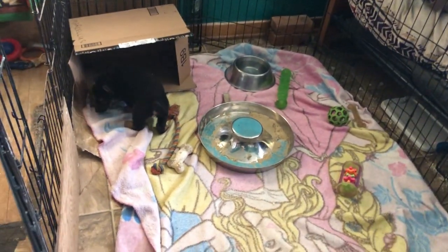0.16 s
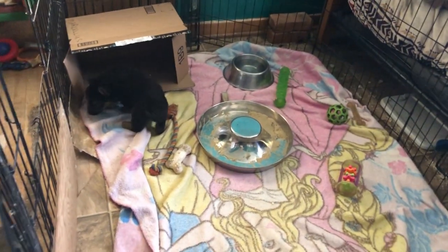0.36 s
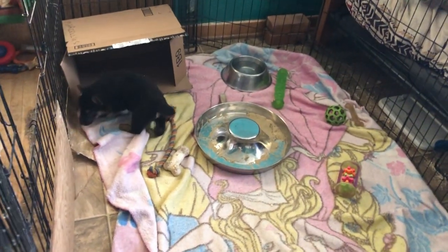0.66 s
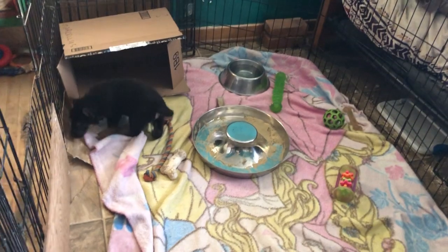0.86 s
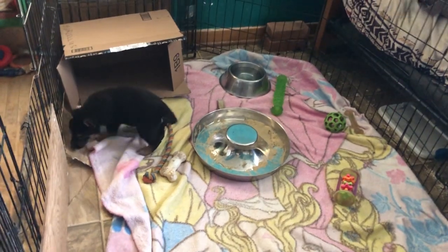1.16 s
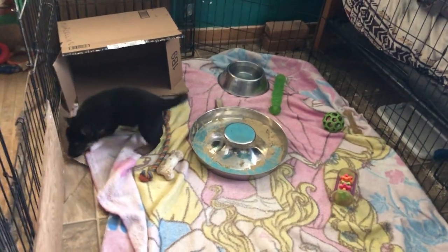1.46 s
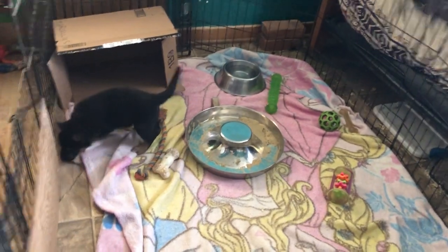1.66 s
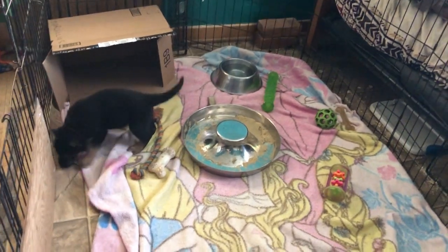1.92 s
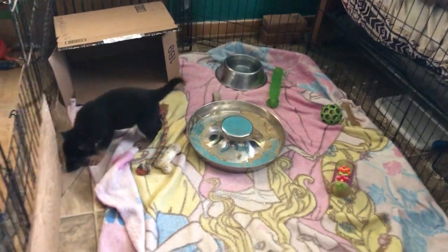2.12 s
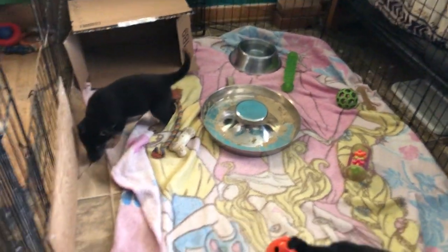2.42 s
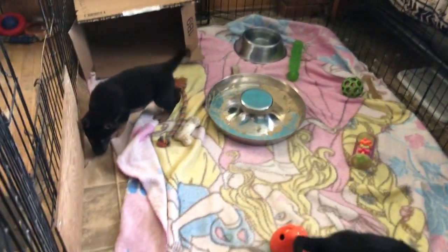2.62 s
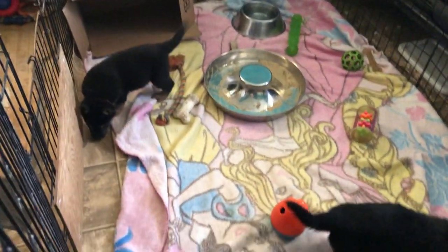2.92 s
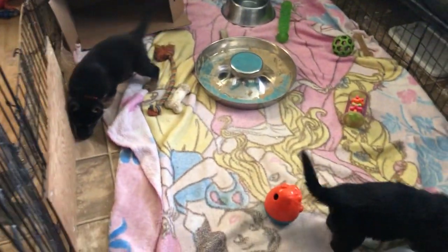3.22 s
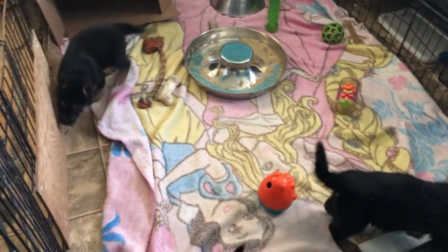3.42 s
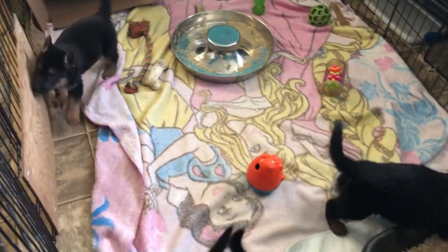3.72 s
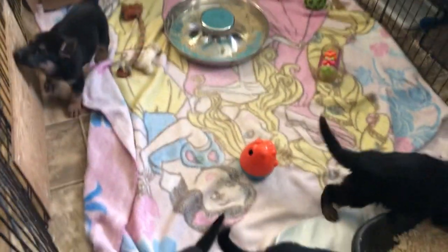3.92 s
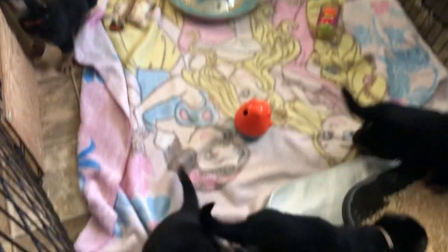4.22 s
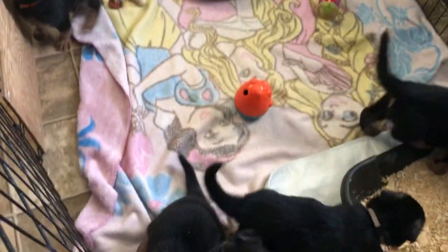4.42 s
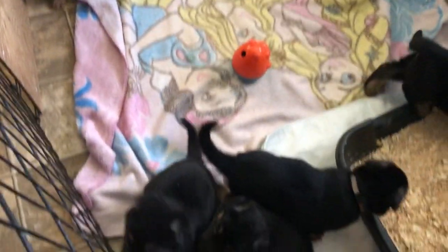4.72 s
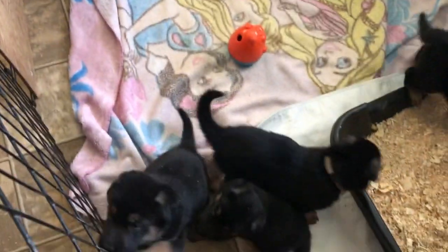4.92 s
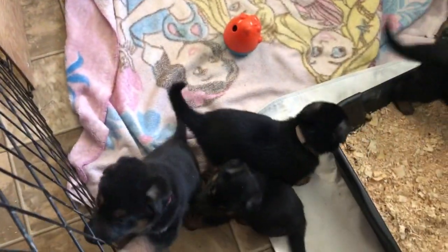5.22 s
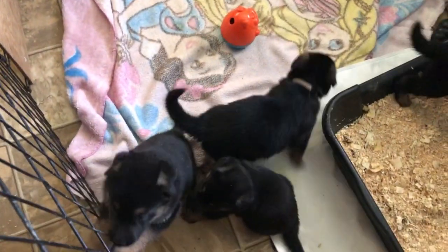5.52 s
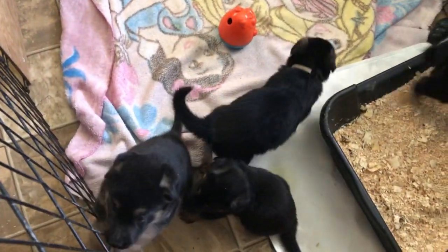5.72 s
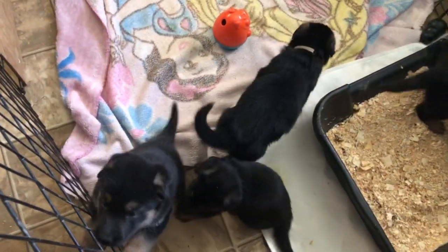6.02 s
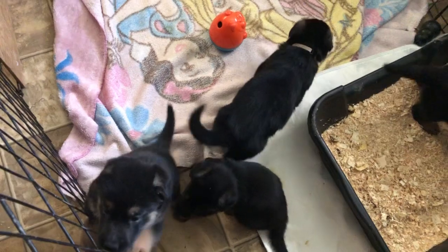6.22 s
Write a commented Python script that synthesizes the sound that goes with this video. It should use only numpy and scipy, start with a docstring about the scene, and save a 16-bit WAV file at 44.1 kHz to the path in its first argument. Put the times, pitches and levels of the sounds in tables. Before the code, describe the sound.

Young puppies cry in a pen in a small room. After faint paw scuffs on a blanket come short, high yelps that rise and fall, some cracking or ending in a thin nasal whistle. A few sharp taps sound close to the microphone. The yelps run together with longer whines, peak once more, then ease into soft whimpers. The room rings briefly after each cry over a quiet background.

```python
"""Young puppies whine in a wire pen indoors: short arching yelps run together into softer, longer whimpers.
Their vocal folds sound a stack of harmonics, coloured by throat and mouth, that roughens and cracks under
strain. Many cries end in a thin whistle of air in the nose. Paws scuff the blanket, a few sharp taps
sound close by, and a small room rings after every cry over a quiet room tone."""
import sys
import numpy as np
from scipy import signal
from scipy.fft import rfft, irfft, next_fast_len
from scipy.io import wavfile
from scipy.ndimage import uniform_filter1d, map_coordinates

SR = 44100
rng = np.random.default_rng(int(sys.argv[2]) if len(sys.argv) > 2 else 0)


def put_to_file(sound):
    """Save the sound as 16-bit audio at rate SR, in the file named by the first command-line argument."""
    columns = np.atleast_2d(sound).T  # one column per channel
    safe = np.clip(columns, -1, 1)
    whole_steps = np.round(safe * 32767)
    wavfile.write(sys.argv[1], SR, whole_steps.astype(np.int16))


N = 280476


def amp(db):
    """Decibels to gain."""
    return 10 ** (np.asarray(db) / 20)


def unit(x):
    """Scaled to rms 1."""
    return x / np.sqrt(np.mean(x ** 2) + 1e-20)


def along(points, hz):
    """A curve of (Hz, value) points, read on a log frequency axis."""
    point_hz, values = np.transpose(points)
    return np.interp(np.log(hz + 1), np.log(point_hz), values)


def wobble(rate, size):
    """A smooth random curve with rate knots a second."""
    knots = rng.standard_normal(size // 8 + 4)
    return map_coordinates(knots, [np.arange(size) * rate / SR], mode="mirror")


def filtered(x, response):
    """x through a filter given as a complex gain at each frequency."""
    size = next_fast_len(N + SR // 2)
    return irfft(rfft(x, size) * response(np.fft.rfftfreq(size, 1 / SR)), size)[:N]


def noise(spectrum):
    """Coloured noise of rms 1."""
    return unit(filtered(rng.standard_normal(N), lambda hz: amp(along(spectrum, hz))))


def swell(t, middle, length):
    """A smooth rise and fall that lasts length seconds."""
    return np.cos(np.pi * np.clip((t - middle) / length, -.5, .5))


# The colour of the quiet room. Each row: frequency in Hz, relative level in dB.
ROOM_TONE_COLOUR = [(25, -34), (55, -6.5), (280, 0), (2000, -14.5), (3200, -14.5), (7000, -16.5),
                    (15500, -27)]
def room_tone(start_db=-63, end_db=-60):
    """A low bed of noise that swells a little through the scene."""
    return amp(np.linspace(start_db, end_db, N)) * noise(ROOM_TONE_COLOUR)


# Pad scuffs and claw scrapes on the blanket. Each row: middle and length in seconds, relative level in dB.
PAD_SCUFFS = [(0.02, 0.19, -52), (0.165, 0.15, -52), (0.394, 0.094, -46), (1.108, 0.052, -39.5),
              (2.661, 0.11, -47), (3.07, 0.14, -46), (4.634, 0.13, -45), (5.392, 1.7, -58.5)]
CLAW_SCRAPES = [(0.51, .11, -55.5), (0.803, 0.025, -40.5), (5.11, 0.31, -53), (5.67, 0.14, -52.5)]
# The dull colour of pads and the bright one of claws. Each row: frequency in Hz, relative level in dB.
PAD_COLOUR = [(50, -22), (170, -2), (480, -2.5), (1200, -14.5), (15000, -30.5)]
CLAW_COLOUR = [(500, -13.5), (1200, -12), (7000, -14), (15000, -22.5)]
def paws(grain_db=3):
    """Pads thud softly on cloth and claws scrape over it; both are grainy."""
    t = np.arange(N) / SR
    pads, claws = (sum(amp(db) * swell(t, middle, length) for middle, length, db in strokes)
                   for strokes in (PAD_SCUFFS, CLAW_SCRAPES))
    rubbing = pads * noise(PAD_COLOUR) + claws * noise(CLAW_COLOUR)
    return rubbing * unit(amp(grain_db * wobble(150, N)))


# Sharp taps close by. Each row: start in seconds, relative level in dB.
CLOSE_TAPS = [(0.383, -52), (1.579, -29.5), (1.876, -32.5), (2.161, -34), (2.365, -29), (3.787, -32)]
# The body of a tap. Each row: frequency in Hz, gain in dB.
TAP_COLOUR = [(25, -25.5), (60, -12.5), (400, 8), (1100, -12.5), (2200, -6.5), (15000, -43)]
def taps(gain_db=33, bass_lag_s=.033, corner_hz=65):
    """Dry ticks that drop into a small thump: the bass arrives later than the treble."""
    def thump(hz):
        lag_cycles = bass_lag_s * corner_hz * np.log1p(hz / corner_hz)
        return amp(along(TAP_COLOUR, hz)) * np.exp(-2j * np.pi * lag_cycles)

    blows = np.zeros(N)
    for start, db in CLOSE_TAPS:
        blows[round(start * SR)] = amp(db + gain_db)
    return filtered(blows, thump)


# Open-mouthed yelps. Each row: start, rise and fall in seconds, pitch at the start and at the top in Hz,
# fundamental at the top in dB, swell in dB, overtone offset in dB, overtones lost in the fall in dB,
# mouth resonance in Hz, shrillness in dB, crack from 0 to 1.
YELPS = [(0.762, 0.035, 0.066, 1013, 948, -45, 11, -15, 16, 2080, 20, 0.63),
         (1.006, 0.061, 0.067, 873, 1114, -16, 22, -14.5, -2, 3800, 2, 0.55),
         (1.278, 0.044, 0.086, 843, 1059, -18.5, 22, -14.5, 0.5, 4050, -19.5, 0.08),
         (1.577, 0.052, 0.12, 920, 1097, -12.5, 26, -17, 5.5, 3650, 1.5, .05),
         (1.948, 0.055, 0.039, 765, 947, -25.5, 20.5, -6.5, -11.5, 2755, 2.5, 0.56),
         (2.312, 0.065, 0.047, 722, 832, -36.5, 17, 7, 11, 3300, -8.5, 0),
         (2.712, 0.057, 0.046, 769, 1007, -27, 12.5, 1, 13, 2780, 1.5, 0.05),
         (3.133, 0.057, 0.046, 712, 1016, -17.5, 24, -4.5, -10.5, 3040, 4, 0.35),
         (3.657, 0.059, 0.061, 732, 1036, -21.5, 14, 1, 14, 3100, -0.5, 0.06),
         (4.161, 0.062, 0.046, 782, 1180, -8.5, 23.5, -11.5, -17, 2850, -5, 0.35),
         (4.672, 0.06, 0.052, 688.5, 841, -30.5, 7.5, -8, 6.5, 2150, -5, 0.09),
         (4.785, 0.053, 0.059, 786, 841, -32, 2.5, -22, 18, 4900, -13, 0),
         (5.425, 0.092, .06, 773, 835, -51.5, 12, -0.5, 1, 3700, -7, 0.13),
         (5.74, 0.068, 0.097, 777, 913, -45, 6, -12, -2.5, 4380, -3, 0.43),
         (6.095, 0.056, 0.017, 765, 865, -29.5, 7.5, -25, -8, 1900, 11.5, 0.6),
         (6.178, 0.026, 0.04, 891, 854, -42, 6, 0, 32, 4640, -8, 0.03)]
def yelp(start, rise, fall, first_hz, top_hz, top_db, swell_db, overtones_db, dull_db, mouth_hz, shrill_db):
    """The contour of a yelp: pitch and level arch together as the mouth opens, then closes."""
    rise_bend, fall_bend = 1.6, 1.2  # 1 = straight flanks, 2 = a round top
    knee, steepness, fade_ratio = 0.66, 4.87, 1.3  # shape of the swell; the fade goes deeper
    closed_at_start, closed_at_end, muffled_start_db = 0.2, 0.7, 2.5
    arch = np.linspace(-1, 1, 41)  # 0 is the top
    before, after = np.maximum(-arch, 0), np.maximum(arch, 0)
    times = start + rise * (1 - before) + fall * after
    sag_hz = top_hz - landing_pitch(times[-1], top_hz)
    pitch = top_hz - (top_hz - first_hz) * before ** rise_bend - sag_hz * after ** fall_bend
    held_back = 1 - 1 / (1 + (before / knee) ** steepness)
    level = top_db - swell_db * (held_back + fade_ratio * after ** fall_bend)
    overtones = overtones_db - muffled_start_db * before ** 2 - dull_db * after
    mouth = mouth_hz * (1 - closed_at_start * before ** 2 - closed_at_end * after)
    return np.column_stack(np.broadcast_arrays(times, pitch, level, overtones, mouth, shrill_db))


JOIN_S = .028  # notes closer than this run together
def landing_pitch(end, top_hz, sag=0.09):
    """The pitch that a yelp ends on: that of the note it runs into, or a plain sag if none follows."""
    starts = [(s, hz) for s, _, _, hz, *_ in YELPS] + [(s, hz) for s, _, hz, *_ in WHINES]
    return next((hz for s, hz in starts if abs(s - end) < JOIN_S), top_hz * (1 - sag))


def cracks(t, length_s=0.057, leap_share=0.0744, leap_s=.02):
    """The voice cracks at the top of a yelp: the strain on the folds, and a brief upward flip of pitch."""
    strain = leap = 0
    for start, rise, *_, crack in YELPS:
        top = start + rise
        strain += crack * swell(t, top, length_s)
        leap += crack * (t > top - leap_s / 2) * np.exp(-((t - top) / leap_s) ** 2)
    return strain, leap_share * leap


# The throat's colouring of the overtones. Each row: frequency in Hz, gain in dB.
THROAT_COLOUR = [(1400, 1.5), (2200, -7.5), (3100, -6.5), (4200, -6), (5200, -15), (6500, -12), (7800, -21),
                 (8800, -32), (10300, -27.5), (15500, -19.5)]
def resonance_db(hz, mouth_hz, shrill_db, mouth_db=14, mouth_width_hz=500,
                 muzzle_hz=6900, muzzle_width_hz=910):
    """Throat, moving mouth resonance and the muzzle's shrill upper resonance shape an overtone."""
    mouth = mouth_db / (1 + ((hz - mouth_hz) / mouth_width_hz) ** 2)
    muzzle = shrill_db / (1 + ((hz - muzzle_hz) / muzzle_width_hz) ** 2)
    return along(THROAT_COLOUR, hz) + mouth + muzzle


def with_sheen(effort_db, level_db, order, hz, crossover_hz=8200):
    """An overtone's drive in dB: the thin sheen on top leaves by the nose, however open the mouth is."""
    nasal_share = 1 / (1 + (crossover_hz / hz) ** 10)
    sheen_db = -30 + 0.37 * level_db - 1.5 * max(order - 13, 0)  # fades above the 13th harmonic
    return effort_db + nasal_share * (sheen_db - effort_db)


def cry(contour, quiver=.009, waver=0.0071, jitter=0.0043, rough_jitter=0.054, rasp_depth=0.79,
        slack_hz=745, mouth_sway=.07, drift_db=6.5, edge_s=0.007):
    """Vocal folds sound a harmonic stack along a contour; returns it and the envelope of its air pulses."""
    attack_strain, attack_s, catch_share, catch_s = 0.74, 0.014, 0.261, 0.0016
    air_db, strain_air_db, end_air_db, end_s = -51, 7, 9, 0.04
    times, *curves = np.transpose(contour)
    span = np.arange(int((times[0] - edge_s / 2) * SR), min(N, int((times[-1] + edge_s) * SR)))
    t, size = span / SR, len(span)
    pitch, level, overtones, mouth, shrill = (np.interp(t, times, curve) for curve in curves)
    # the folds lose their regular cycle at the attack, in a crack, and when they go slack at low pitch
    strain, leap = cracks(t)
    strain += attack_strain * swell(t, times[0], attack_s)
    rough = strain + np.clip(6 * (1 - pitch / slack_hz), 0, 1)
    catch = catch_share * np.exp((t[0] - t) / catch_s)  # an opening flick down from a higher pitch
    glide = uniform_filter1d(pitch, size=400, mode="nearest") * (1 + leap + catch)
    # jaw and larynx tremble: the vowel sways and the pitch quivers with it
    tremble = wobble(19, size)
    mouth = mouth * (1 + mouth_sway * tremble)
    unsteady = quiver * tremble + waver * wobble(71.4, size)
    pitch = glide * (1 + unsteady + (jitter + rough_jitter * rough) * wobble(334.78, size))
    phase = 2 * np.pi * np.cumsum(pitch) / SR
    wave = amp(level) * np.sin(phase)
    rasp = 1 + rasp_depth * rough * wobble(720, size)  # uneven from cycle to cycle
    effort = level + overtones
    for order in range(2, 22):
        hz = order * pitch
        db = with_sheen(effort, level, order, hz) + resonance_db(hz, mouth, shrill)
        # each overtone drifts in strength as the head moves, the high, narrowly beamed ones most
        db += drift_db * np.minimum(hz / 9500, 1) * wobble(16, size)
        # the highest overtones fray into hiss; in a loud yelp this reaches further down
        fray = (hz / 18500) ** 2 * (1 + 22 * amp(effort)) * wobble(1100, size)
        wave += amp(db) * rasp * np.sin(order * phase + fray) * (hz < SR / 2)
    gate = np.sqrt(2) * np.clip(np.minimum(t - t[0], t[-1] - t) / edge_s, 0, 1)
    voice, air = np.zeros((2, N))
    voice[span] = gate * wave
    # air escapes once a cycle, more of it in a loud or cracking cry and as the cry runs out
    leak_db = strain_air_db * strain + end_air_db * swell(t, times[-1], end_s)
    air[span] = gate * amp(air_db + level / 2 + leak_db) * (1 + np.cos(phase))
    return voice, air


# The hiss of breath. Each row: frequency in Hz, relative level in dB.
BREATH_COLOUR = [(500, -2), (3000, -13), (7300, -7), (9000, -13.5), (11000, -8.5), (15000, -24)]
def puppies(slur_s=.006):
    """All the cries with their breath; yelps and whines that follow closely slur into one unbroken cry."""
    notes = [yelp(*row[:-1]) for row in YELPS] + [whine(*row) for row in WHINES]
    notes.sort(key=lambda note: note[0, 0])  # a contour's first column is time
    contours = notes[:1]
    for note in notes[1:]:
        last, start = contours[-1], note[0, 0]
        if start - last[-1, 0] < JOIN_S:
            contours[-1] = np.vstack([last[last[:, 0] < start - slur_s], note])
        else:
            contours.append(note)
    voice, air = sum(np.array(cry(contour)) for contour in contours)
    return voice + air * noise(BREATH_COLOUR)


# Nasal whistles, mostly at the ends of cries. Each row: middle and length in seconds, final pitch in Hz,
# level of the tone and of its octave in dB.
NOSE_WHISTLES = [(0.829, 0.098, 6920, -47, -50), (1.109, 0.052, 6720, -47, -45),
                 (1.399, 0.098, 6720, -50.5, -50), (1.662, 0.17, 8960, -44.5, -70),
                 (1.762, 0.057, 6800, -46, -58.5), (2.119, 0.033, 6890, -36, -54.5),
                 (4.024, 0.026, 6850, -41.5, -47), (4.504, 0.07, 6820, -44.5, -45),
                 (5.375, 0.04, 7120, -45.5, -71), (5.629, 0.036, 7520, -50, -64),
                 (6.168, 0.034, 7100, -44.5, -64)]
def nose_whistles(fall=0.24, flutter=.008, flicker_db=3, hiss_db=-60):
    """Air whistles in the nose: a thin squeak that drops and settles, with its octave and a little hiss."""
    out = np.zeros(N)
    hiss = amp(hiss_db) * noise(BREATH_COLOUR)
    for middle, length, hz, db, octave_db in NOSE_WHISTLES:
        span = np.arange(int((middle - length / 2) * SR), min(N, int((middle + length / 2) * SR)))
        size = len(span)
        pitch = hz * (1 + fall * np.linspace(1, 0, size) ** 3 + flutter * wobble(400, size))
        phase = 2 * np.pi * np.cumsum(pitch) / SR
        tone = amp(db) * np.sin(phase) + amp(octave_db) * np.sin(2 * phase)
        flicker = amp(flicker_db * wobble(140, size))
        out[span] += swell(span / SR, middle, length) * (flicker * tone + hiss[span])
    return out


# Drawn-out whines. Each row: start and length in seconds, opening pitch, glide and final droop in Hz,
# fundamental around the middle in dB, swell in dB, overtone offset in dB, mouth resonance in Hz.
WHINES = [(2.045, 0.078, 916, 1.5, 60.5, -35, -4, -10, 2500),
          (2.406, 0.127, 821, 108.5, 141.5, -41.5, 2, -6, 3840),
          (2.817, 0.14, 993, 38, 199.5, -36, 11.5, -9.5, 2280),
          (3.235, 0.26, 927.6, 56.5, 288.5, -34, 9.5, -11, 2200),
          (3.756, 0.1, 1017, 104.5, -7.5, -35.5, 11, -7.5, 2130),
          (3.863, 0.159, 1185, -46, 133, -29, -3, -4, 2900),
          (4.274, 0.24, 1139, -28.5, 320, -25, -1, -16, 1550),
          (4.591, 0.078, 644, 64, -3.5, -39.5, -5, -29, 1400),
          (4.887, 0.162, 795.7, 21, 29.5, -31.5, 5, -25.5, 5350),
          (5.093, 0.157, 705, -26.5, 1.5, -46, 12.5, -17, 1403),
          (5.253, 0.125, 828.4, -47, 30, -33.5, 4.5, -24.5, 4700),
          (5.558, 0.056, 658, 173, 22, -38, 15, -22.5, 1310),
          (5.886, 0.066, 662, 160, 127.5, -36.5, 9, -20, 1360),
          (6.233, 0.13, 840.4, 22, 128, -38, -3, -20, 4500)]
def whine(start, length, pitch_hz, glide_hz, droop_hz, db, swell_db, overtones_db, mouth_hz):
    """The contour of a whine: it glides, grows purer as the mouth closes and droops as the air runs out."""
    droop_s, fade_db_per_octave, dull_db = .028, 26.5, 6.5
    release_s, release_db = 0.007, 5.5
    progress = np.linspace(0, 1, 41)
    times, left_s = start + length * progress, (1 - progress) * length
    held = pitch_hz + glide_hz * progress
    pitch = held - droop_hz * np.exp(-left_s / droop_s)
    level = db + swell_db * (progress - .5) + fade_db_per_octave * np.log2(pitch / held)
    level -= release_db * np.exp(-left_s / release_s)
    overtones = overtones_db - dull_db * (progress ** 2 - .5)
    return np.column_stack(np.broadcast_arrays(times, pitch, level, overtones, mouth_hz, 0))


# The ring of the small room. Each row: frequency in Hz, seconds to die away by 60 dB.
ROOM_DECAY = [(200, 0.33), (3000, 0.29), (15000, 0.099)]
def room_reverb(x, gap_s=.005):
    """Walls and floor answer after a short gap; each frequency dies at its own speed."""
    hz, t, spectrum = signal.stft(rng.standard_normal(SR // 2), SR, nperseg=256)
    decay = amp(-60 * t / along(ROOM_DECAY, hz)[:, None])
    tail = signal.istft(spectrum * decay, SR, nperseg=256)[1]
    tail = np.pad(tail / np.linalg.norm(tail), (int(gap_s * SR), 0))
    return signal.fftconvolve(x, tail)[:N]


def scene(far_send_db=-6, near_send_db=-13, paws_db=-3):
    """The litter comes closer, so its reverb send falls; the taps stay dry."""
    litter = puppies() + nose_whistles() + amp(paws_db) * paws()
    reverb = room_reverb(litter * amp(np.linspace(far_send_db, near_send_db, N)))
    return (litter + reverb + taps() + room_tone())[None]


def record(dry, top_hz=15850):
    """A brick-wall low-pass takes off the very top of the treble."""
    return filtered(dry[0], lambda hz: hz < top_hz)[None]


dry = scene()
out = record(dry)
put_to_file(out)
```